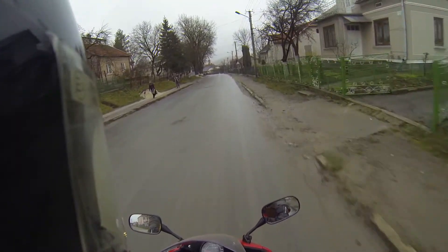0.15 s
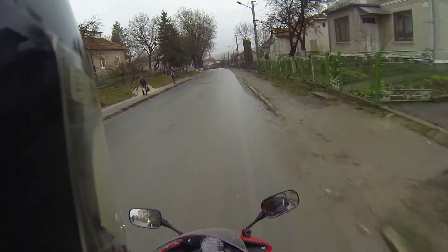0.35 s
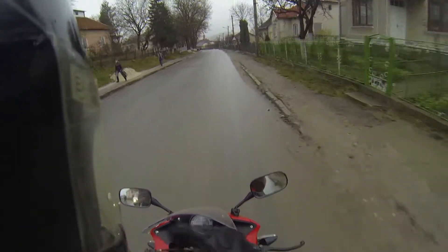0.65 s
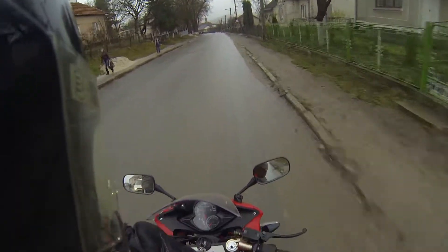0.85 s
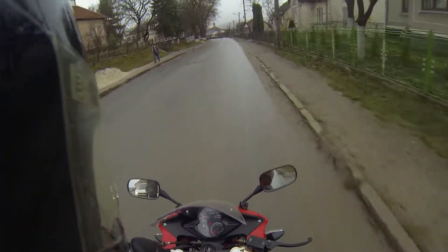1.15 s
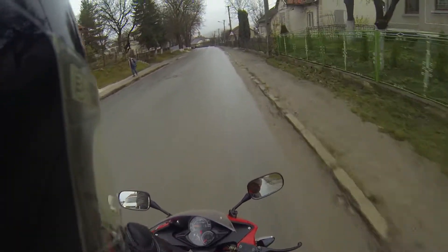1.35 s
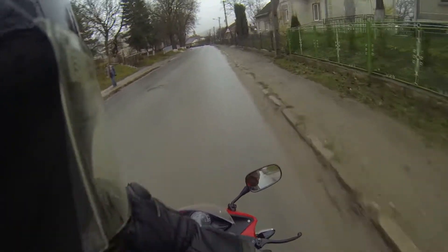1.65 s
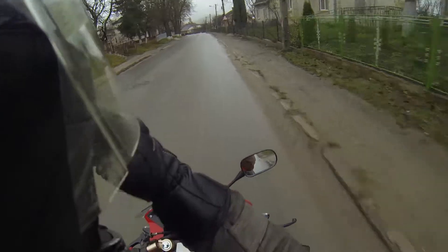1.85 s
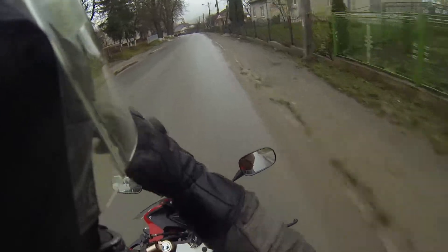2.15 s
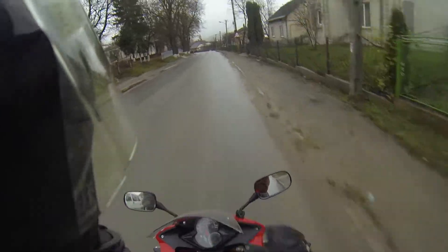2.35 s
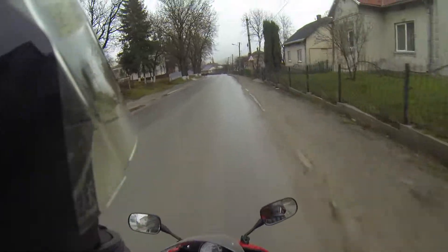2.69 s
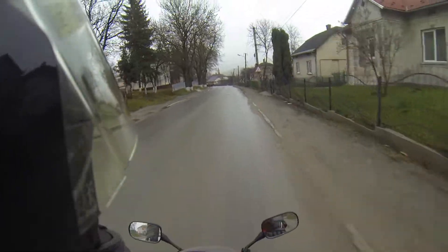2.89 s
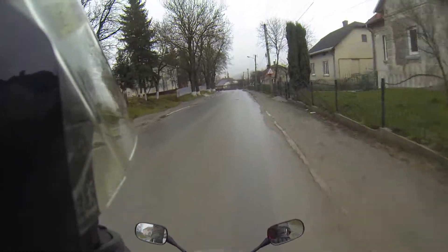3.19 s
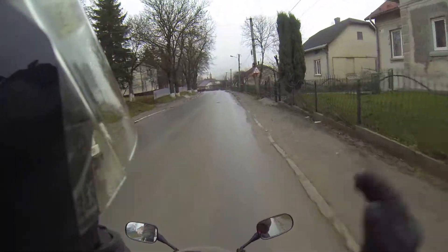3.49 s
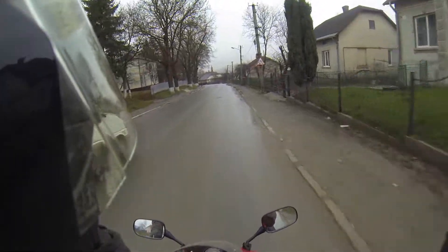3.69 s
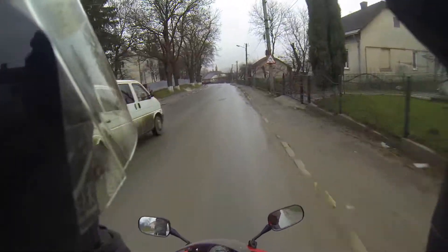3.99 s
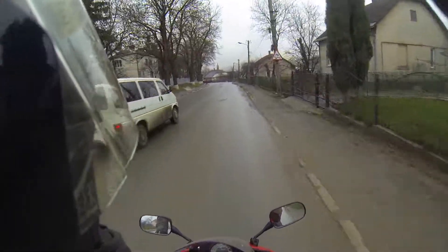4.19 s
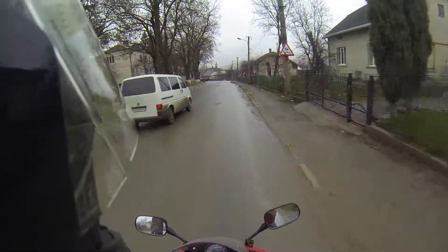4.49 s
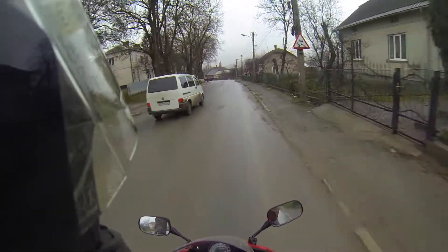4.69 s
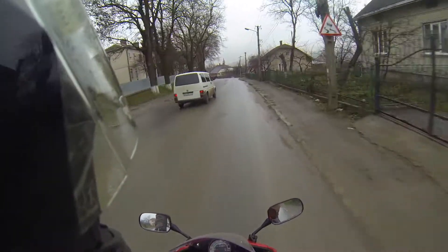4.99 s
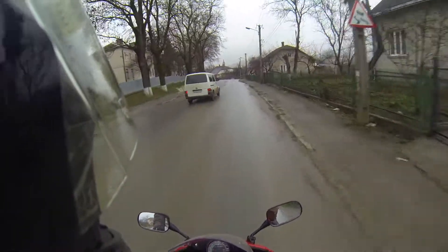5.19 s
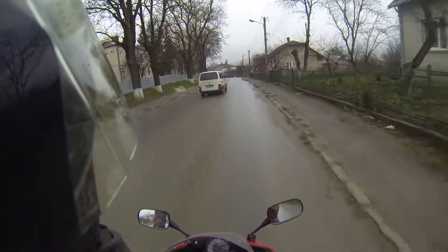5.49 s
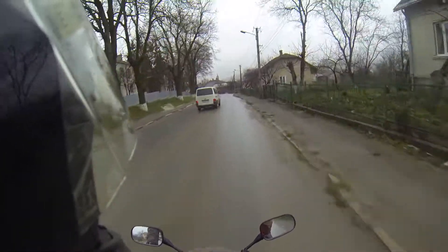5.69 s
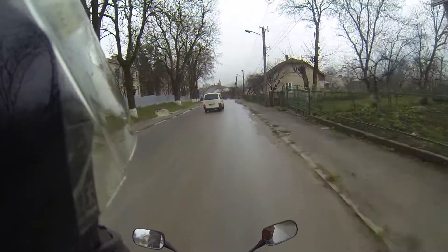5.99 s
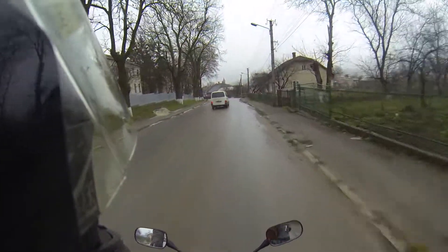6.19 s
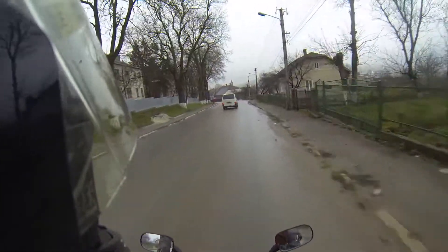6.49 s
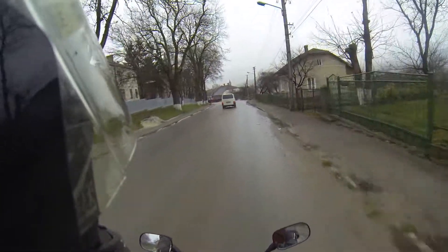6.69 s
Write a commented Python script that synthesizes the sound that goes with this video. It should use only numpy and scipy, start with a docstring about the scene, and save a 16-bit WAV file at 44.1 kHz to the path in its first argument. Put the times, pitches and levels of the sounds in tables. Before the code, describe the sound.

Heard from a microphone in a plastic case on a rider's helmet, wind and wet road noise run throughout with a hollow whistle and an uneven rumble. Early on, a glove clicks and thumps against the helmet. A second, longer spell of knocks and short leathery scrapes follows as the visor is closed and a van's tyre spray passes softly. Then the wind carries on with a thin whistle.

```python
"""A wet village road, heard from a camera in a plastic case on a moving rider's helmet.
Wind and road noise reach the microphone through the case, which boosts the pitches it rings at.
The camera's mount sways at a very low pitch. A gloved hand knocks and rubs the helmet and shuts
the visor, and a van overtakes with a hiss of wet tyres."""
import sys
import numpy as np
from scipy import signal
from scipy.fft import rfft, irfft
from scipy.io import wavfile
from scipy.ndimage import uniform_filter1d

SR = 44100
rng = np.random.default_rng(int(sys.argv[2]) if len(sys.argv) > 2 else 0)


def dump(signal):
    """Clip the signal to [-1, 1] and save it as 16-bit WAV at the path in sys.argv[1]."""
    limited = np.clip(np.atleast_2d(signal).T, -1, 1)
    pcm = np.round(limited * 32767).astype(np.int16)
    wavfile.write(sys.argv[1], SR, pcm)


N = 302084

# Wind and road noise over the case: time_s, whistle_db, road_hiss_db
WIND_AND_ROAD = [(0.0, -40, -46.5), (0.36, -38, -45.5), (0.61, -39, -46.5), (1.2, -35, -45),
                 (1.47, -37, -44.5), (1.7, -34.5, -41), (1.98, -37.5, -46.5), (2.3, -35, -44.5),
                 (2.65, -34, -43.5), (2.8, -36, -45.5), (3.1, -34.5, -42), (3.45, -36, -42.5),
                 (3.75, -33.5, -43.5), (4.3, -35, -44.5), (4.7, -34.5, -43), (5.04, -37, -42.5),
                 (5.19, -34, -44), (5.49, -37, -45.5), (5.65, -33, -43), (5.8, -39, -46),
                 (6.85, -39.5, -46)]


def mount_sway(t):
    """Jolts rock the camera on its springy mount, over the slower heave of the helmet."""
    # Jolts of the mount: start_s, hold_s, level_db, fade_db_per_s, pitch_hz
    swings = [(0.29, .02, -41, 80, 27.8), (0.74, 0.0092, -29, 500, 28.65), (0.88, 0.011, -19, 247, 31.1),
              (0.98, 0.026, -17, 402, 31.2), (1.16, 0.026, -31, 62, 30.4), (1.45, 0.011, -9.5, 290, 31.14),
              (1.58, 0.018, -23, 56, 28.8), (1.77, 0.039, -14, 188, 26.98), (1.95, .02, -18.5, 110, 27.1),
              (2.13, 0.059, -21.5, 170, 27.32), (2.29, 0.0091, -23, 170, 26.5),
              (2.44, 0.011, -29, 60, 26.4), (2.56, 0.0098, -23.5, 200, 26.5),
              (2.76, 0.0086, -23, 400, 26.9), (3.43, .01, -40, 280, 30.9), (3.76, 0.0084, -36, 120, 26.78),
              (3.89, 0.0091, -11, 230, 27.3), (3.96, .02, -20, 84, 28.7), (4.17, 0.036, -23, 51, 28.6),
              (4.27, .01, -18.5, 190, 29.96), (4.5, .14, -21, 64, 30.34), (4.69, .01, -23, 220, 29.9),
              (4.83, 0.012, -24, 500, 26), (5.02, 0.011, -35, 220, 29.8), (5.23, 0.0078, -30, 180, 32.1),
              (5.69, 0.082, -13, 600, 26.36), (5.86, 0.011, -20, 110, 26.45), (6.41, 0.007, -39, 200, 26.5),
              (6.54, .01, -30, 60, 26.14)]
    # Nods of the head: start_s, hold_s, level_db, fade_db_per_s
    nods = [(0.27, .01, -29, 400), (0.88, .01, -22, 200), (0.95, 0.087, -21.5, 400), (1.53, .01, -28, 280),
            (1.77, .02, -20.5, 72), (1.96, .02, -27, 90), (2.21, 0.0095, -32, 400), (3.28, 0.019, -29, 300),
            (3.5, 0.067, -28.5, 200), (3.7, .01, -27, 300), (3.93, .01, -14, 110), (4.14, 0.025, -19, 280),
            (4.37, 0.0091, -17, 200), (4.5, 0.21, -16.5, 290), (4.83, .03, -20.5, 138),
            (4.96, 0.0085, -20.5, 250), (5.06, 0.0092, -26.5, 70), (5.28, .01, -18, 65),
            (5.61, 0.061, -24.5, 320), (5.91, 0.011, -26, 64), (6.18, 0.0085, -23.5, 125),
            (6.41, 0.0053, -21.5, 400), (6.54, 0.0094, -21.5, 180)]
    sway_gain = jolt_gain(swings, t, rise_db_per_s=334, rest_db=-37.5)
    heave_gain = jolt_gain(nods, t, rise_db_per_s=300, rest_db=-35)
    wander = slow_drift(3000)
    sway_hz = curves(swings, t)[-1] * (1 + 0.1218 * wander)
    heave_hz = 11.0 * (1 + 0.302 * wander[::-1])
    sway = np.sin(2 * np.pi * (np.cumsum(sway_hz) / SR + rng.random()))
    heave = np.sin(2 * np.pi * (np.cumsum(heave_hz) / SR + rng.random()))
    return np.sqrt(2) * (sway_gain * sway + heave_gain * heave)


def jolt_gain(jolts, t, rise_db_per_s, rest_db):
    """A swing builds up to each jolt, holds and fades; the road keeps it stirring in between."""
    level = gain_of(rest_db + 5.5 * slow_drift(2500))
    for start_s, hold_s, db, fade_db_per_s, *_ in jolts:
        before_db = rise_db_per_s * np.maximum(start_s - t, 0)
        after_db = fade_db_per_s * np.maximum(t - start_s - hold_s, 0)
        level = np.maximum(level, gain_of(db - before_db - after_db))
    return uniform_filter1d(level, size=900)


def glove_knocks(mix):
    """Each knock is a sharp hit, then a ragged chatter; each spot on the shell rings differently."""
    # Knocks: start_s, snap_peak_db, bright_db_per_octave, blow_ms, thud_vs_snap_db, pitch_factor
    knocks = [(1.4272, -10, -15, 1, -15, .9), (1.5245, -18, -5, 0.29, -14, .92),
              (1.6335, -23.5, 0, 0.97, 1.5, 0.82), (1.7226, -29, -7, 0.4, -8, 0.93),
              (1.7437, -15.5, -14, 0.32, -2.5, 0.89), (1.75, -15, -10, 0.83, -19, 0.96),
              (1.783, -22, -20, 0.23, -5, .88), (1.8379, -21, -2, 0.4, -10, .92),
              (1.8589, -14.5, -11, 0.53, -20, 0.89), (1.8649, -16.5, -3, 0.49, -5, 0.91),
              (1.8915, -22, -16, 0.46, -7, 0.94), (1.931, -24, -18, 0.68, -4, 0.94),
              (1.955, -22.5, -17, 0.66, -5, .86), (3.7711, -18, -27, 1, -6, 0.98),
              (3.8486, -15.5, -3, 0.4, -14, 0.97), (4.0722, -15, -8, 0.63, -16, 0.96),
              (4.2391, -13, -1, 0.19, -12, 1.0), (5.0273, -17, 1, 0.66, -9, 0.99),
              (5.0344, -14.5, -25, 0.51, -19, 0.99), (5.2579, -17, -4, 0.35, -12, 0.98),
              (5.28, -11.5, -2, 0.63, -12.5, 1.0)]
    for start_s, db, bright_db, blow_ms, thud_db, pitch_factor in knocks:
        blow = rng.standard_normal(300) * np.exp(-np.arange(300) / SR * 1000 / blow_ms)
        blow[0] += 4.5  # the first sharp hit
        snap_peak = abs(shell_ring(blow, bright_db, -100, pitch_factor)).max()
        add(mix, start_s, gain_of(db) * shell_ring(blow, bright_db, thud_db, pitch_factor) / snap_peak)


def helmet_thumps(mix):
    """Soft pushes through the helmet die away quickly, sagging in pitch."""
    # Dull jolts: start_s, peak_db, pitch_hz, ring_s (time to fade by 60 dB)
    thumps = [(0.86, -7, 92, 0.12), (1.423, -13.5, 89, 0.081), (1.632, -14.5, 104, 0.058),
              (1.731, -15, 68, 0.083), (1.744, -8, 130, 0.024), (1.951, -19, 84, 0.12),
              (2.13, -21, 125, 0.17), (3.764, -45, 75, 0.076), (3.858, -16.5, 65.3, 0.21),
              (4.028, -13.5, 76, 0.12), (4.235, -14.5, 69, 0.1), (4.481, -16.5, 67.8, 0.089),
              (4.657, -20, 67.1, 0.068), (5.028, -34, 121.6, 0.07), (5.269, -32, 69.4, 0.11),
              (6.583, -26, 230, 0.018)]
    t = np.arange(SR // 4) / SR
    for start_s, db, hz, ring_s in thumps:
        shape = (1 - np.exp(-t / 0.0014)) * gain_of(-60 * t / max(ring_s, .02))
        tone = np.sin(2 * np.pi * hz * t * (1 - t))
        add(mix, start_s, gain_of(db) * shape / shape.max() * tone)


def glove_rubs(mix):
    """Leather drags over plastic in many tiny, uneven slips; the hand presses in, then lets go."""
    # Strokes: start_s, length_s, firmest_at (0 to 1), level_db, bright_db_per_octave, rasp_vs_ring_db
    rubs = [(1.418, 0.018, 0.18, -21.5, 7, -33.5), (3.844, 0.056, 0.46, -27, 8.5, -15),
            (3.887, 0.047, 0.19, -20.5, 3, -21.5), (3.916, 0.06, 0.69, -22.5, 6.5, -35),
            (3.986, 0.05, 0.76, -24.5, 6, -20), (4.056, .02, 0.99, -27, 0, -33),
            (4.135, 0.049, .45, -25, 4.5, -19.5), (4.483, 0.054, 0.68, -16.5, 3, -33),
            (4.588, 0.059, 0.41, -20.5, 4, -26), (4.667, 0.045, 0.353, -21.5, 4.5, -31),
            (4.792, 0.032, 0.38, -33, 2, -22), (4.874, 0.042, 0.33, -25.5, 0.5, -32),
            (5.627, 0.031, 1, -32.5, 7, -18), (5.651, 0.023, 0.56, -23, 7, -17.5)]
    # Tone of the bare scraping: pitch_hz, level_db
    rasp_tone = [(3000, -27), (4500, 3), (6000, 2), (8500, -4.5), (11000, -20), (13000, -11), (15000, -24)]
    draws, slips_per_s = SR // 10, 6000
    for start_s, length_s, firmest_at, db, bright_db, rasp_db in rubs:
        progress = np.arange(0, 1, 1 / (SR * length_s))
        n = len(progress)
        sizes = rng.standard_normal(draws) * gain_of(2 * np.minimum(rng.exponential(1, draws), 3))
        slips = (sizes * (rng.random(draws) < slips_per_s / SR))[:n]
        press_db = np.interp(progress, [0, np.clip(firmest_at, .05, .95), 1], [-7.5, 0, -13.5])
        stroke = gain_of(db + press_db) * signal.windows.tukey(n, .15)
        steady_level = np.sqrt(np.sum(shell_ring(slips, 0, -100, 1) ** 2) / n)
        ring = shell_ring(slips * stroke, bright_db, thud_db=-17, pitch_factor=0.95)
        rasp = irfft(rfft(slips) * gain_of(db_at(rasp_tone, np.fft.rfftfreq(n, 1 / SR))), n)
        add(mix, start_s, ring / steady_level)
        add(mix, start_s, gain_of(rasp_db) * stroke * unit_level(rasp))


def shell_ring(push, bright_db, thud_db, pitch_factor):
    """Helmet and case ring with a low thud and a high snap; harder contact lifts the top tones."""
    # Natural tones of helmet and case: pitch_hz, level_db, ring_s (time to fade by 60 dB)
    shell_tones = [(193.4, 1, 0.045), (278.5, 2, 0.03), (373, -1, 0.035), (930, 1.5, 0.014),
                   (1442, 2, 0.019), (1552, 13.5, 0.018), (1861, 4, 0.015), (1982, 11.5, 0.012),
                   (2350, -4, 0.0092), (2650, 5.5, 0.01), (2920, -1, 0.019), (3485, -6.5, 0.011),
                   (5040, -9.5, 0.0034), (6070, -27, 0.015), (8200, -34, .004), (11400, -36.5, 0.0021)]
    t, snap, thud = np.arange(2600) / SR, 0, 0
    push = np.pad(push, (0, len(t)))
    for hz, db, ring_s in shell_tones:
        rise = (1 - np.exp(-1.5 * hz * t)) ** 2  # builds up in about one cycle
        tone = rise * gain_of(db - 60 * t / ring_s) * np.sin(2 * np.pi * hz * pitch_factor * t)
        if hz < 1000:  # the hollow low tones answer the overall push, not the grit in it
            thud += signal.oaconvolve(abs(push), tone)[:len(push)]
        else:
            lift = gain_of(bright_db * max(np.log2(hz / 1450), 0))
            snap += signal.oaconvolve(push * lift, tone)[:len(push)]
    snap = signal.sosfilt(signal.butter(4, 1100, "high", fs=SR, output="sos"), snap)
    return snap + gain_of(thud_db) * abs(snap).max() * thud / abs(thud).max()


def case_wind(t):
    """Wind makes the air in the case whistle and its wall drone, and buffets the helmet."""
    # Ringing of the air in the case: pitch_hz, width_hz, level_db
    air_peaks = [(1406, 113, 7.5), (1494, 203, 3.5), (1770, 300, -16)]
    # Ringing of the case wall: pitch_hz, width_hz, level_db
    wall_peaks = [(397.2, 12.3, -1), (357, 23.4, -9)]
    # Tone of the buffeting: pitch_hz, level_db
    buffet_tone = [(26, -26), (50, -13), (57, 1.5), (67, 4.5), (80, -6.5), (97, -1), (125, -8), (160, -9.5),
                   (187, -3), (215, -11), (250, -13.5), (302, -13), (320, -9), (420, -48), (700, -120)]
    # Rumble, strongest while the hand works at the visor: time_s, buffet_db, drone_db
    rumble_levels = [(0.0, -41, -48), (0.6, -40, -48.5), (0.88, -39, -51), (1.05, -31.5, -45),
                     (1.25, -36, -43), (1.5, -34, -47), (1.72, -28.5, -36.5), (1.95, -37, -36.5),
                     (2.1, -31.5, -41), (2.25, -28.5, -40.5), (2.54, -33, -43.5), (2.9, -37.5, -41.5),
                     (3.15, -36.5, -46.5), (3.5, -35, -45.5), (3.8, -36.5, -43), (4.1, -42.5, -49),
                     (4.48, -39.5, -48), (4.71, -38, -45), (5.0, -39, -50.5), (5.19, -41.5, -45),
                     (5.75, -39, -52.5), (6.0, -37.5, -49.5), (6.35, -37, -44.5), (6.85, -38.5, -52.5)]
    whistle_db, _ = curves(WIND_AND_ROAD, t)
    buffet_db, drone_db = curves(rumble_levels, t)
    buffet_colour = lambda hz: gain_of(db_at(buffet_tone, hz)) * (hz > 40) / (1 + (hz / 330) ** 4)
    whistle = noise(peaks(air_peaks), patchy_db=0.5, flicker_db=0.5)
    drone = noise(peaks(wall_peaks), patchy_db=0.5, flicker_db=1.6, size=2048)
    buffet = noise(buffet_colour, patchy_db=1.5, flicker_db=-0.74, size=4096)
    return gain_of(whistle_db) * whistle + gain_of(drone_db) * drone + gain_of(buffet_db) * buffet


def road_hiss(t):
    """The broad hiss of the road, with some pitches boosted by the case."""
    # Tone of the hiss: pitch_hz, level_db
    hiss_tone = [(500, 0.5), (900, -5.5), (1150, -3.5), (2200, -4.5), (3000, -10.5), (4400, -22),
                 (6800, -32.5), (9000, -36.5), (12000, -39), (15500, -49)]
    # Boosts from the case: pitch_hz, width_hz, lift_db
    boosts = [(874, 85, 7.5), (2460, 120, 9), (2880, 77, 17), (4880, 190, 10), (6000, 600, 6.5),
              (7200, 370, 6), (13600, 700, 5)]
    _, hiss_db = curves(WIND_AND_ROAD, t)
    lift_db = lambda hz: sum(db / (1 + (2 * (hz - pitch) / width) ** 2) for pitch, width, db in boosts)
    colour = lambda hz: gain_of(db_at(hiss_tone, hz) + lift_db(hz)) * (hz > 200)
    return gain_of(hiss_db) * noise(colour, patchy_db=0.8, flicker_db=0.3)


def visor_wind(t):
    """Air hisses at the edge of the open visor and whistles thinly past the shut one."""
    # Hiss at the edge: pitch_hz, width_hz, level_db
    edge_peaks = [(3095, 330, -0.5), (6020, 400, -19.5)]
    # Its loudness, high while the visor is open: time_s, level_db
    edge_levels = [(0.0, -57), (0.88, -57), (1.05, -50.5), (2.25, -44.5), (2.75, -45), (3.13, -53.5),
                   (3.5, -50.5), (3.83, -53), (4.03, -44), (4.21, -54), (5.04, -64), (5.19, -54),
                   (5.65, -55), (5.9, -61), (6.4, -55), (6.85, -64)]
    # Thin whistles: pitch_hz, width_hz, level_db
    slit_peaks = [(3687, 375, 12), (5380, 180, 3.5), (6350, 580, -0.5), (7900, 510, -2),
                  (10300, 440, -12.5)]
    # Their loudness, high once the visor is shut: time_s, level_db
    slit_levels = [(0.0, -60.5), (0.9, -59.5), (1.2, -55.5), (2.3, -55.5), (2.72, -61), (2.98, -55),
                   (3.45, -60.5), (4.1, -51), (5.0, -49.5), (5.5, -50), (5.8, -56), (6.5, -58), (6.85, -63)]
    edge = noise(peaks(edge_peaks), patchy_db=2.1, flicker_db=-0.5)
    slit = noise(peaks(slit_peaks), patchy_db=1.5, flicker_db=0.6)
    return gain_of(curves(edge_levels, t)[0]) * edge + gain_of(curves(slit_levels, t)[0]) * slit


def tyre_spray(t):
    """Wet tyres throw spray; the van's grows as it draws up and thins as it pulls ahead."""
    # Tone of the spray: pitch_hz, width_hz, level_db
    spray_peaks = [(4830, 520, 1.5), (9200, 670, -20), (10740, 2400, -21.5), (13600, 400, -18.5)]
    # Spray from the rider's own tyres: time_s, level_db
    own_levels = [(0.0, -69), (0.8, -67), (1.25, -63), (2.0, -61.5), (2.75, -61), (3.4, -65), (6.85, -80)]
    alongside_s, alongside_db, side_m = 3.86, -52, 3.1
    van_m_per_s = np.where(t < alongside_s, 33, 4.5)  # nears fast, leaves slowly
    ahead_m = van_m_per_s * (t - alongside_s)
    van_gain = gain_of(alongside_db) * side_m / np.hypot(side_m, ahead_m)
    own_gain = gain_of(curves(own_levels, t)[0])
    return np.hypot(own_gain, van_gain) * noise(peaks(spray_peaks), patchy_db=1.5, flicker_db=1.0)


def noise(colour, patchy_db, flicker_db, size=512):
    """Noise shaped by colour(hz), with drifting patches and a flicker shared by all pitches."""
    hz, frames = np.fft.rfftfreq(size, 1 / SR), 4 * N // size + 5
    real, imag, patches = rng.standard_normal((frames, len(hz), 3)).T
    patches = unit_level(uniform_filter1d(uniform_filter1d(patches, size=9, axis=0), size=7, axis=1))
    flicker = unit_level(uniform_filter1d(rng.standard_normal(frames), size=4))
    unevenness = gain_of(patchy_db * patches + flicker_db * flicker)
    spectrum = (real + 1j * imag) * colour(hz)[:, None] * unevenness
    return unit_level(signal.istft(spectrum, nperseg=size, noverlap=3 * size // 4)[1][:N])


def peaks(rows):
    """A noise colour with a steep peak at each row's pitch."""
    return lambda hz: np.sqrt(sum((gain_of(db) / (1 + ((hz - pitch) / width) ** 2)) ** 2
                                  for pitch, width, db in rows))


def slow_drift(size):
    """A random wobble, smoothed over `size` samples."""
    return unit_level(uniform_filter1d(uniform_filter1d(rng.standard_normal(N), size), size))


def gain_of(db):
    return 10 ** (np.asarray(db) / 20)


def unit_level(x):
    return x / np.sqrt(np.mean(x ** 2) + 1e-20)


def db_at(points, hz):
    pitches, levels = np.transpose(points)
    return np.interp(np.log(hz + 1), np.log(pitches + 1), levels)


def curves(rows, t):
    """One curve over time for each column after the first."""
    times, *columns = np.transpose(rows)
    return [np.interp(t, times, column) for column in columns]


def add(mix, start_s, sound):
    part = mix[round(start_s * SR):][:len(sound)]
    part += sound[:len(part)]


def scene():
    """The steady sounds of the ride, with knocks, thumps and rubs on top, in one channel."""
    t = np.arange(N) / SR
    mix = case_wind(t) + road_hiss(t) + visor_wind(t) + tyre_spray(t) + mount_sway(t)
    glove_knocks(mix)
    helmet_thumps(mix)
    glove_rubs(mix)
    return mix[None]


def record(dry):
    """The case dulls the highest treble; then the camera cuts off the very top."""
    case_hz, camera_hz = 13800, 15200
    dulled = signal.sosfilt(signal.butter(4, case_hz, fs=SR, output="sos"), dry)
    top_cut = signal.firwin(511, camera_hz, window=("kaiser", 9), fs=SR)
    return signal.oaconvolve(dulled, top_cut[None], "same")


dry = scene()
out = record(dry)
dump(out)
```